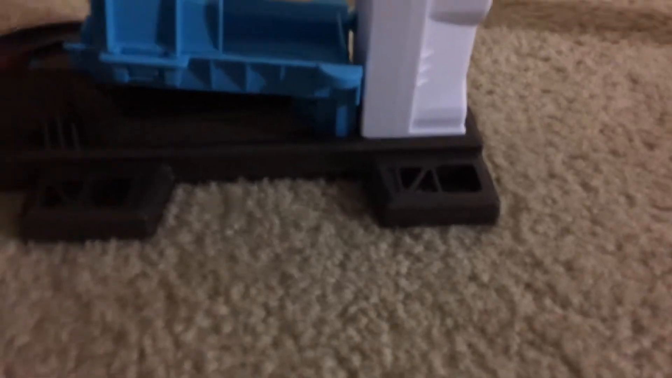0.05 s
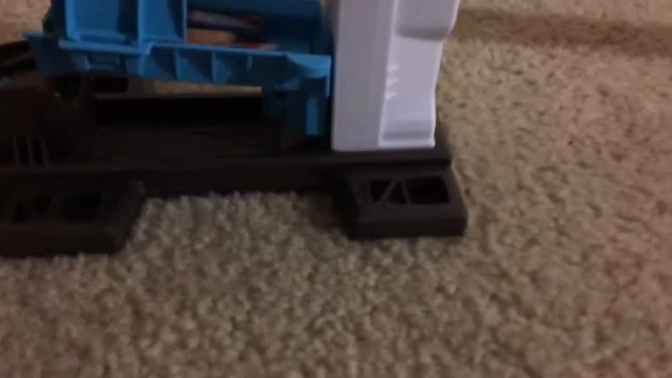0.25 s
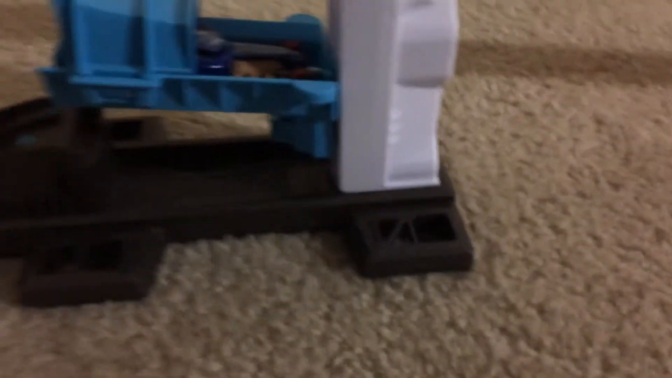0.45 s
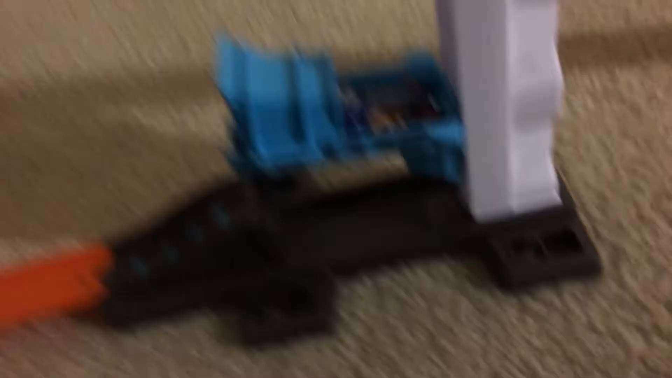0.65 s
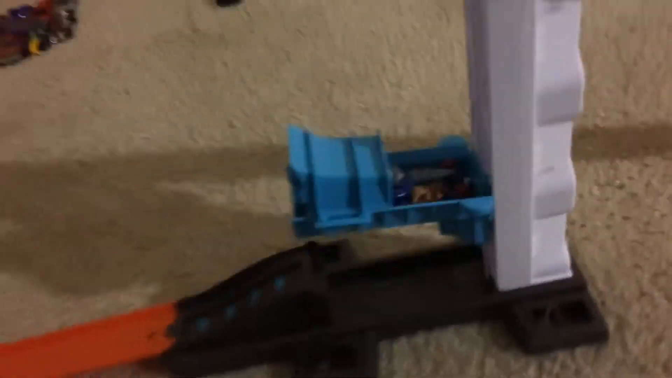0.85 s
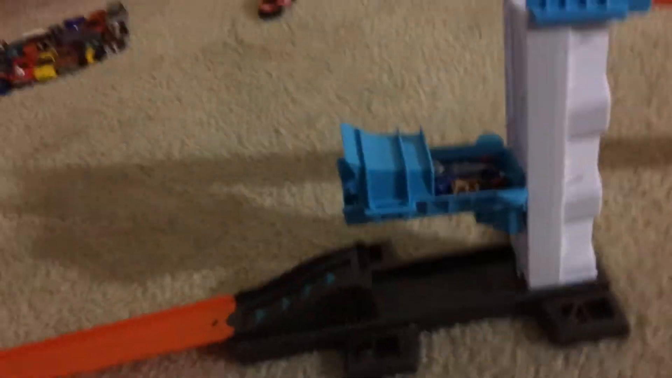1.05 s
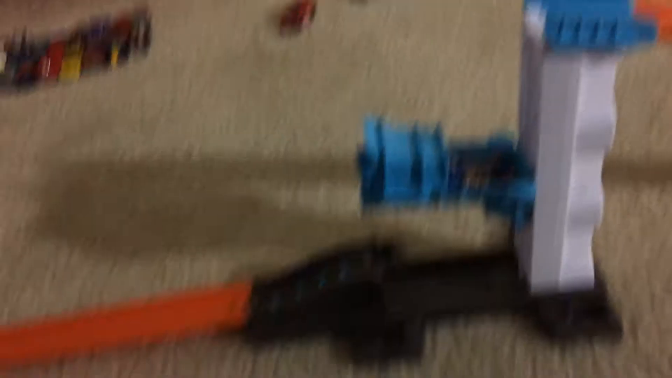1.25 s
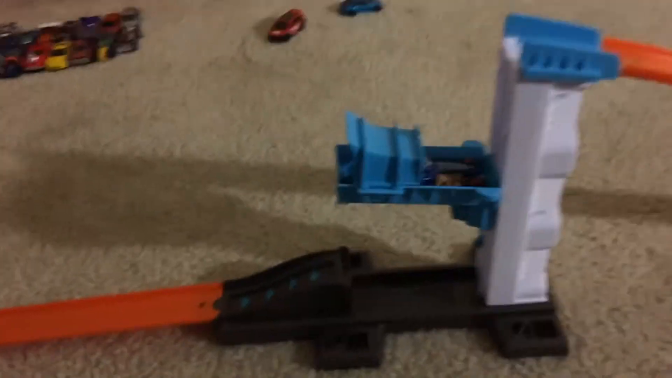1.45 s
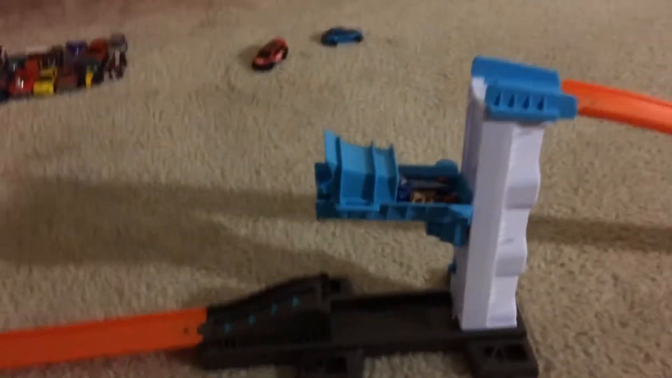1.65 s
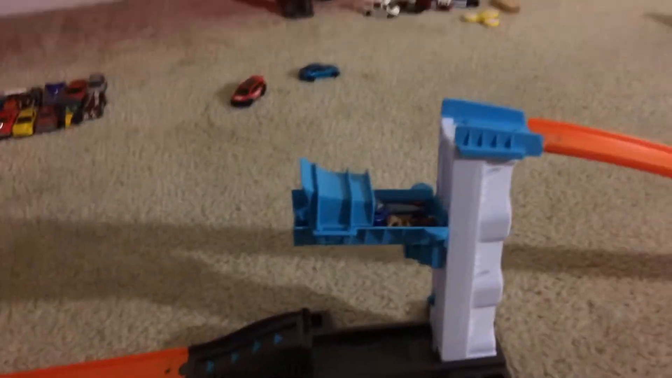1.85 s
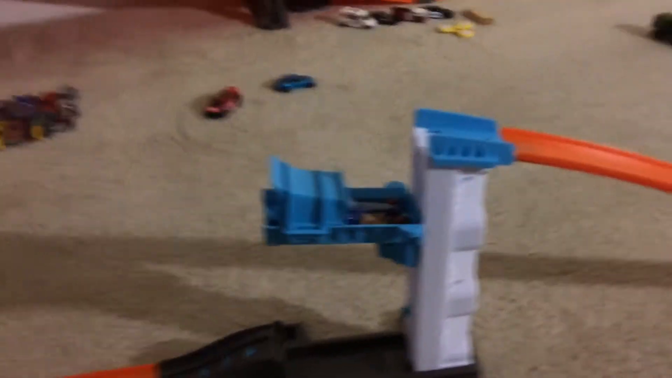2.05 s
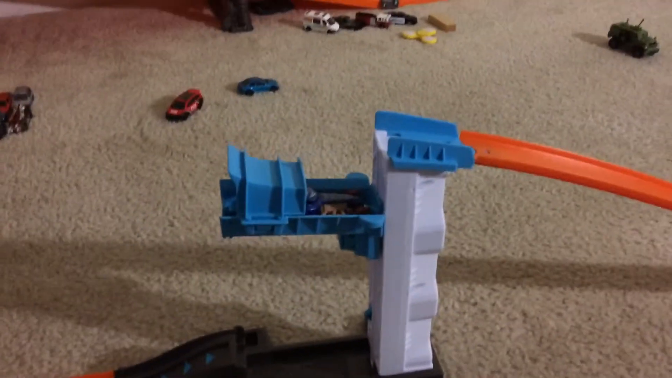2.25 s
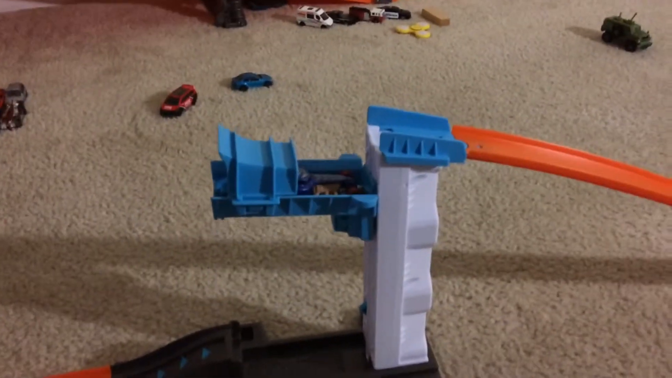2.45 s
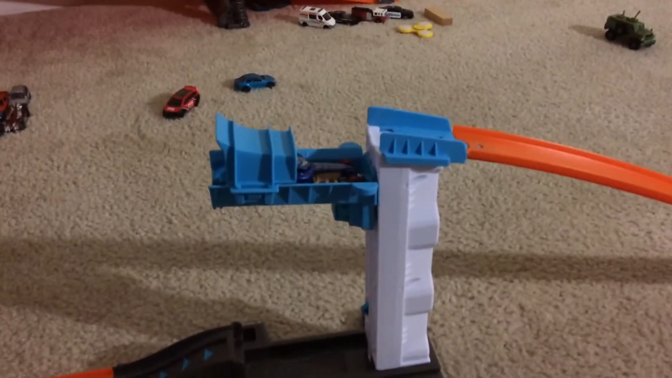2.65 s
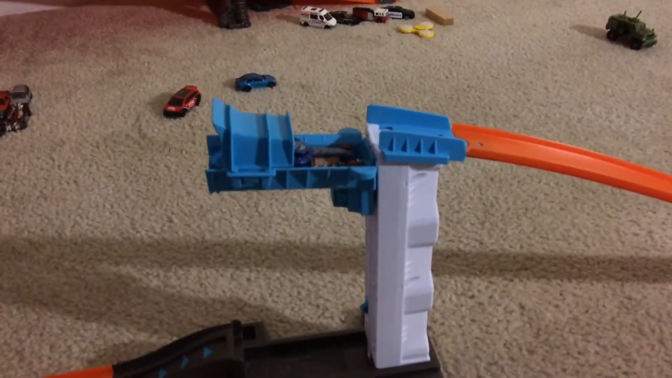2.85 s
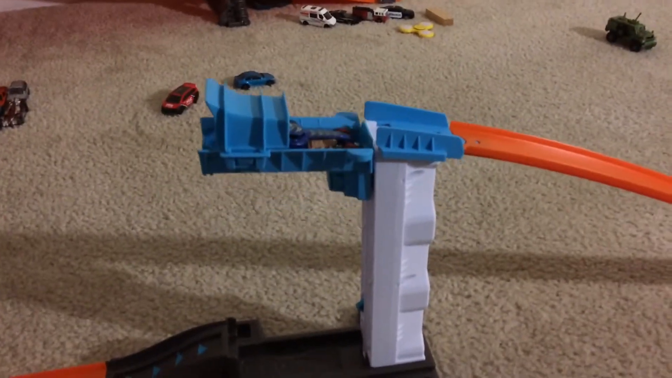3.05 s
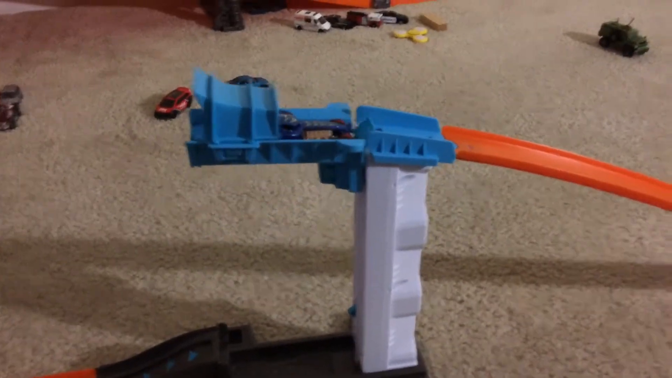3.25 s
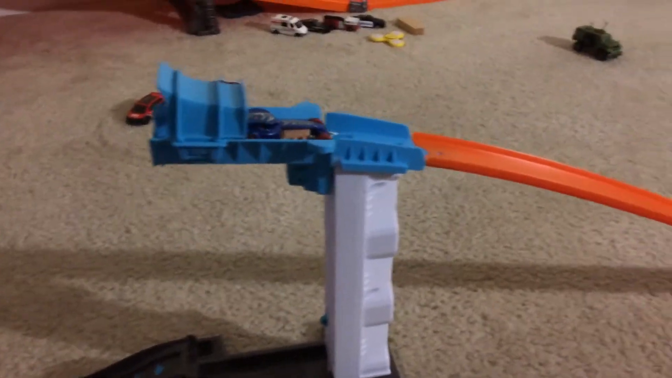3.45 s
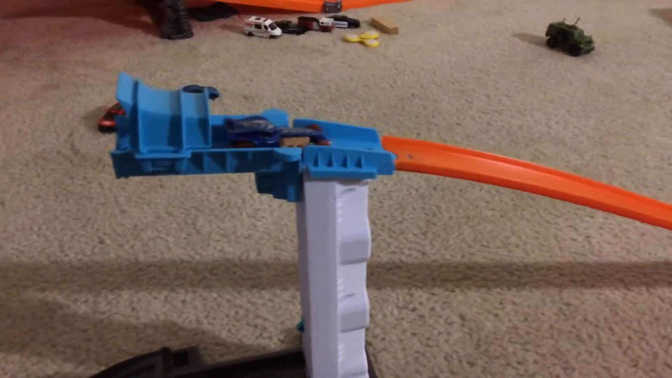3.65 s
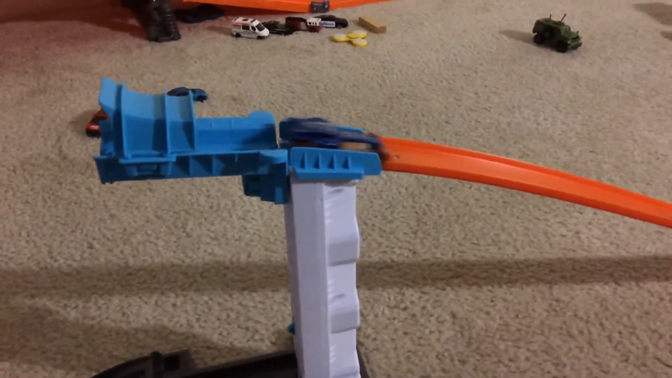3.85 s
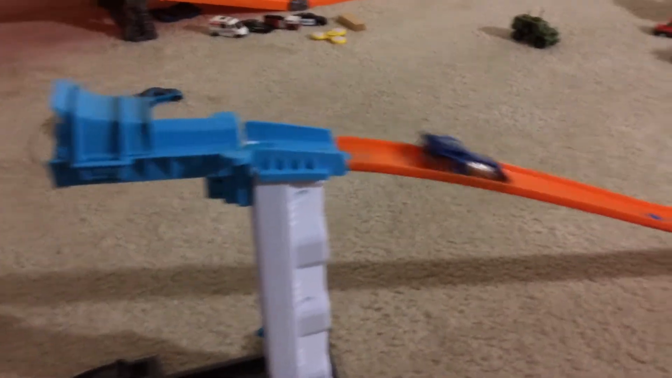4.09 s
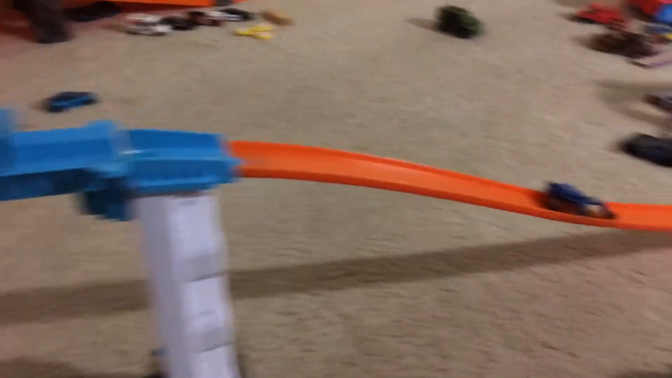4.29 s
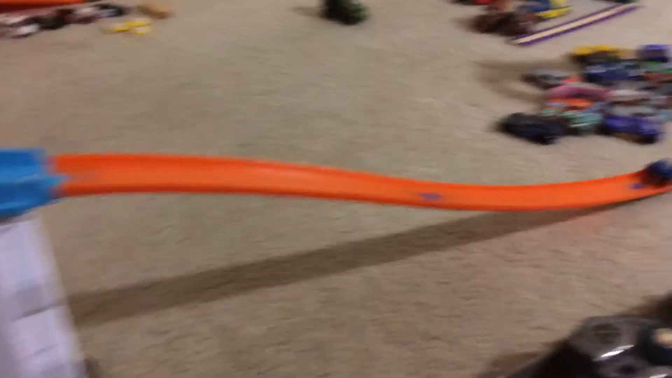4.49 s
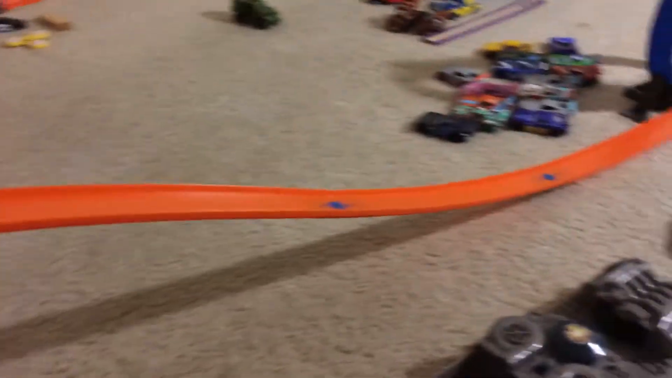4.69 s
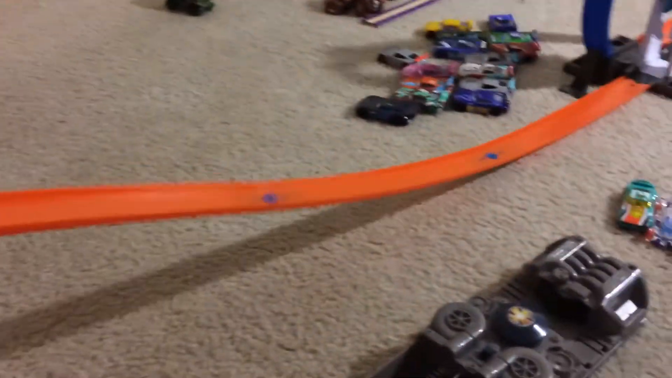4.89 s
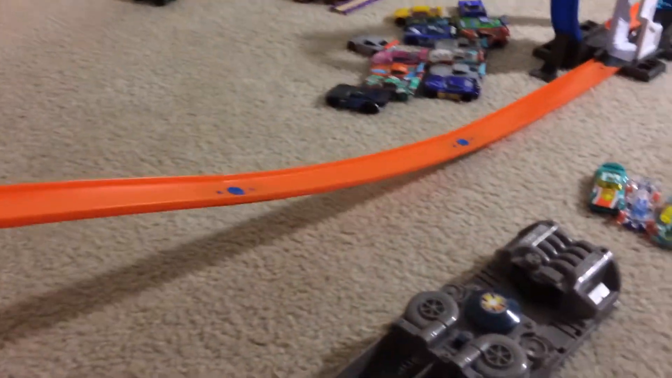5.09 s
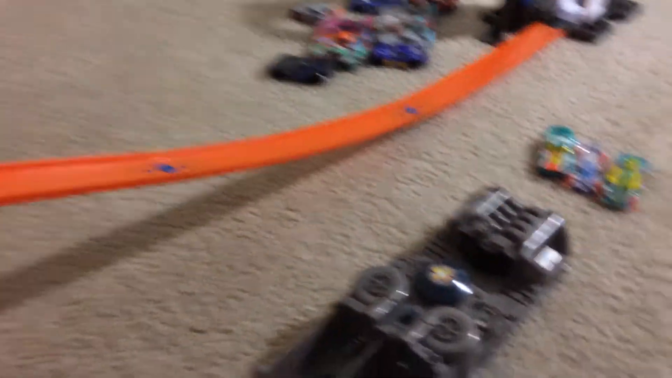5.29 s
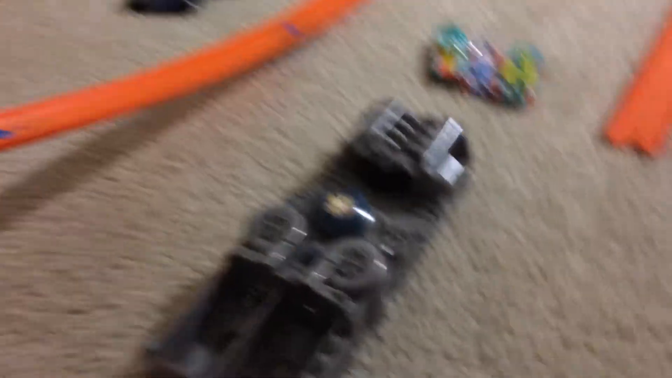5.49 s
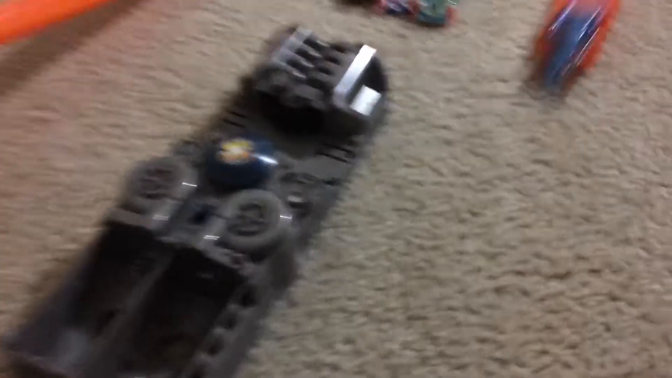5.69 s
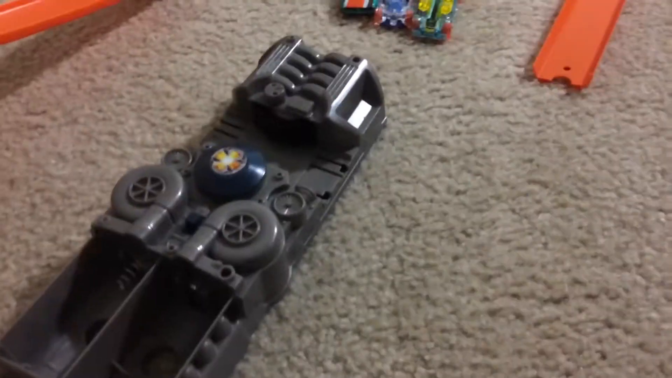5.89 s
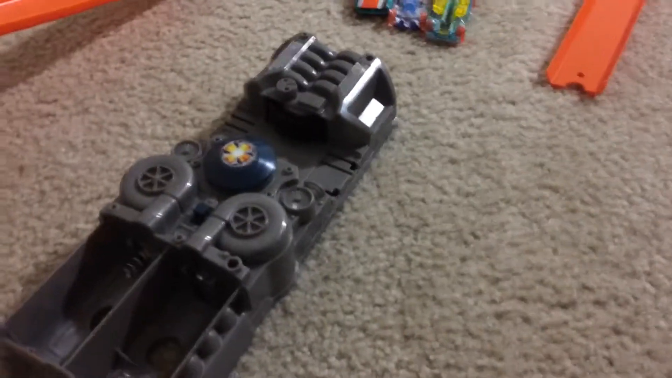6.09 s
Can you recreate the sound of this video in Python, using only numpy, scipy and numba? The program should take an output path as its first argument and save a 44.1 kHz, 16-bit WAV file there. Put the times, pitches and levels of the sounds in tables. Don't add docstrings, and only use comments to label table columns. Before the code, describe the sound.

Close up in a furnished room, a catch creaks faintly and a plastic toy lift breaks loose with a loud, dense clatter. A bright, gear-like hiss whirs for over three seconds, its tone shifting as the handheld microphone moves, then stops abruptly. A small die-cast car clicks onto the track, rolls off with growing chatter, slams hard into a loop, and rattles away to a faint wheel spin.

```python
import sys
import numpy as np
from scipy import signal
from scipy.fft import rfft, irfft
from scipy.io import wavfile
from scipy.ndimage import uniform_filter1d
from numba import njit

SR = 44100
rng = np.random.default_rng(int(sys.argv[2]) if len(sys.argv) > 2 else 0)


def gain_from_db(level_db):
    decades = np.asarray(level_db, float) / 20
    return 10 ** decades


def pcm_store(signal):
    levels = np.round(np.clip(np.atleast_2d(signal), -1, 1) * 32767)
    wavfile.write(sys.argv[1], SR, levels.astype(np.int16).T)


N = 270244


def rms_one(x):
    return x / np.sqrt(np.mean(x ** 2) + 1e-20)


def in_time(rows):
    s, *columns = np.transpose(rows)
    return [np.interp(np.arange(N) / SR, s, c) for c in columns]


def at_hz(points, hz):
    points = np.array(points)
    return np.interp(np.log(hz), np.log(points[:, 0]), points[:, 1])


def drift(rate):
    r = np.exp(-80 * np.pi * rate / SR)
    white = rng.standard_normal(N // 40 + 2002)
    slow = signal.lfilter([1], [1, -2 * r, r * r], white)[2000:]
    return np.interp(np.arange(N) / 40, np.arange(len(slow)), rms_one(slow))


def cut(x, hz, kind, order=2):
    return signal.sosfilt(signal.butter(order, hz, kind, fs=SR, output="sos"), x)


def coloured(x, spectrum):
    hz = np.maximum(np.arange(N // 2 + 1) * SR / N, 1)
    return rms_one(irfft(rfft(x) * gain_from_db(at_hz(spectrum, hz)), N))


@njit
def resonance(x, hz, width_hz, rate):
    out, r = np.zeros(len(x)), np.exp(-np.pi * width_hz / rate)
    for i in range(2, len(x)):
        drive = (1 - r * r) / 2 * (x[i] - x[i - 2])
        out[i] = drive + 2 * r * np.cos(2 * np.pi * hz[i] / rate) * out[i - 1] - r * r * out[i - 2]
    return out


def swells(x, rows, width_hz, width_share, top=2):
    t = np.arange(N) / SR
    for s, half_s, hz, slide, db in rows:
        near = abs(t - s) < 3 * half_s
        since = t[near] - s
        bell = gain_from_db(db) * np.exp(-(since / half_s) ** 2)
        gain = top * bell if top > 0 else top * np.minimum(bell, 1)
        x = x.copy()
        x[near] += gain * resonance(x[near], hz + slide * since, width_hz + width_share * hz, SR)
    return x


def friction(per_s, spread_db, grain_db, flutter_db):
    sizes = gain_from_db(spread_db * np.minimum(rng.exponential(1, N), 4)) * rng.choice([-1, 1], N)
    grains = rms_one(sizes * (rng.random(N) < per_s / SR))
    flutter = gain_from_db(flutter_db * (drift(36.0) + drift(90.0)))
    return (rng.standard_normal(N) + gain_from_db(grain_db) * grains) * flutter


def patchy(x, patchy_db, width, length):
    cells = signal.stft(x, nperseg=1024)[2]
    field = rng.standard_normal(cells.shape)
    for size, axis in ((width, 0), (length, 1)) * 2:
        field = uniform_filter1d(field, size, axis=axis)
    return signal.istft(cells * gain_from_db(patchy_db * rms_one(field)), nperseg=1024)[1][:N]


def tilted(x, middle_db, low_db, top_db, edges_hz):
    hz, spectrum = np.arange(N // 2 + 1) * SR / N, rfft(x)
    low = irfft(spectrum / (1 + (hz / edges_hz[0]) ** 6), N)
    top = irfft(spectrum / (1 + (edges_hz[1] / (hz + 1)) ** 6), N)
    middle = x - low - top
    return gain_from_db(middle_db) * rms_one(middle) + gain_from_db(low_db) * rms_one(low) + gain_from_db(top_db) * rms_one(top)


def knocks(events, thud_db, ring_db, width_hz, thud_hz, low_hz=900.):
    out, t = np.zeros(N + 4096), np.arange(4096) / SR
    whites = rng.standard_normal((len(events), 4096))
    for (s, peak_db, hz, snap_db, t60), white in zip(events, whites):
        burst = white * gain_from_db(-60 * t / max(t60, .002)) * np.minimum(t / .0002, 1)
        crack = cut(burst, [low_hz, 7000.], "band")
        crack = crack + gain_from_db(ring_db) * resonance(crack, np.full(len(t), float(hz)), width_hz, SR)
        snap = cut(burst, [7000, 12500], "band")
        thud = cut(white * gain_from_db(-60 * t / 0.038), [70., thud_hz], "band")
        parts = (crack, 0), (snap, snap_db), (thud, thud_db + 0.28 * snap_db)
        for part, rel_db in parts:
            out[round(s * SR):][:len(t)] += gain_from_db(peak_db + rel_db) * part / abs(part).max()
    return out[:N]


def still_air():
    # f/Hz, level/dB per Hz
    air_spectrum = [(15, -23), (25, 10.5), (131, 9.5), (190, 7), (270, -3), (475, -2), (709, -4), (927, -3),
                    (1180, -16), (1720, 0), (1960, -13), (2930, -1), (4870, -10), (10000, -20),
                    (15000, -25)]
    return gain_from_db(-58.5) * coloured(rng.standard_normal(N), air_spectrum)


def grip():
    # t/s, level/dB, f/Hz
    creak = [
        (0, -52.5, 150),
        (.04, -46, 257),
        (.075, -52, 330),
        (.09, -72.5, 330),
    ]
    level_db, hz = in_time(creak)
    return gain_from_db(level_db) * rms_one(resonance(rng.standard_normal(N), hz, 120., SR))


def lift():
    # f/Hz, level/dB per Hz
    gears = [(450, -12), (760, -6), (1060, -7), (1520, -7.5), (1870, -10), (3830, -3.5), (4350, -5),
             (6000, -2.5), (6740, -2.5), (10300, 0), (14500, -3.5), (15700, -10), (16300, -24)]
    # t/s, half length/s, f/Hz,
    # slide/(Hz/s), level/dB
    tower_modes = [(0.06, 0.051, 3560, 31, 7.5), (0.164, 0.02, 960, 37, 7), (.85, .2, 1120, -100, -4.5),
                   (2.598, 0.24, 1490, 30, -10), (.3, 0.18, 2800, -30, -4), (0.334, 0.13, 1680, -29, 4.5),
                   (0.627, 0.46, 2390, -200, -4.5), (0.58, 0.21, 4150, -150, -4),
                   (0.916, .17, 3810, -1200, 0.5), (1.1, 0.14, 2620, 198, -1),
                   (1.502, 0.17, 4030, -100, -11), (1.216, 0.21, 774, 33, -2.5), (1.64, 0.11, 836, 31, 2),
                   (2.072, 0.25, 3500, -300, 0.5), (2.297, 0.36, 3930, 53, -14),
                   (2.018, 0.15, 2620, 400, -1.5), (2.092, 0.31, 935, 100, -2), (2.6, 0.4, 3310, 51, -11.5),
                   (2.625, 0.24, 1390, 304, -6), (2.892, 0.31, 2920, 52, -2),
                   (3.041, 0.19, 3880, -100, -0.5), (3.19, 0.16, 2056, -100, -1.5),
                   (3.2, 0.26, 1500, 34, -5),
                   (.34, 0.22, 7330, -300, -4), (.34, 0.2, 9070, 296, -0.5), (.56, 0.12, 6370, 101, -6),
                  (.9, 0.31, 10350, 1501.5, -9.5), (1.3, 0.23, 5800, 96, -15), (1.35, 0.2, 9800, 3008, -5),
                  (1.45, 0.083, 7930, 53, 2), (2.22, 0.33, 6260, -500, -0.5), (2.67, 0.35, 7440, -500, -15),
                  (3.45, .1, 9650, 51, -6)]
    # t/s, half length/s, f/Hz, slide/(Hz/s), depth/dB below full
    shadows = [(.95, 0.084, 4200, 50, -6), (1.25, .1, 2910, 50, -6), (0.547, 0.1, 6800, 1508, -7),
               (1.222, 0.21, 3460, 101, -5), (2.0, 0.2, 5120, 55, -9), (2.303, 0.35, 6660, 50, -0.5),
               (2.973, 0.16, 4400, -100, 3), (3.247, 0.27, 780, 50, 0)]
    # f/Hz, width/Hz, depth 0-1
    hollows = [(1830, 35, 0.5), (5240, 50, 0.1), (6420, 120, 0.5), (8280, 64, 0.9)]
    # t/s, level/dB, how far the gears face the microphone/dB
    press = [
        (0.0, -45.5, -61),
        (0.016, -39, -35.5),
        (0.068, -31, -36.5),
        (0.087, -49.5, -25.5),
    ]
    climb = [(0.1, -34, -21), (0.15, -29, -5), (0.159, -19.5, -3.5), (0.244, -26, -0.5), (0.4, -28, -1.5),
             (0.49, -22.5, -3.5), (0.69, -22, -3), (1.25, -26.5, -2.5), (2.6, -27, -1), (3.42, -24.5, -7.5)]
    stop_s, stopped_db = 3.572, -51.5

    hiss = patchy(coloured(friction(2500., 3.8, -9.0, 0.28), gears), 1.9, width=6, length=17)
    hiss = swells(hiss, tower_modes, 70, .04)
    hiss = swells(hiss, shadows, 440, 0, top=-1.06)
    for hz, width_hz, depth in hollows:
        hiss = hiss - min(depth, 1) * resonance(hiss, np.full(N, float(hz)), float(width_hz), SR)
    hiss = cut(hiss, 745.0, "high", order=20) + gain_from_db(-25) * hiss

    t = np.arange(N) / SR
    level_db, facing_db = in_time(press + climb + [(stop_s, stopped_db, climb[-1][2])])
    body_db = level_db - 14 - 0.35 * facing_db - 1.5 * (t - 1)
    gear_top_db = level_db + 4.5 + facing_db
    running = np.clip((stop_s - t) / 0.13, 0, 1)
    return running * tilted(hiss, level_db, body_db, gear_top_db, (1500., 7000.))


def catch_release():
    # t/s, peak level/dB, ring f/Hz, snap above 7 kHz/dB relative, t60/s
    release = [(0.0555, -17, 3260, -23, 0.027), (0.069, -14.5, 3050, -10.5, 0.024),
               (0.0905, -1, 5530, -7, 0.0064), (0.0965, -7, 5570, -13, 0.018),
               (0.0995, -5, 1940, -7, 0.013), (0.1055, 1, 3720, -14, .022), (0.113, -10, 3920, -9.5, 0.015),
               (0.1205, -15.5, 2500, -8.5, 0.02), (0.1225, 0.5, 6150, -1, 0.032),
               (0.125, 0.5, 5340, -4, 0.021), (0.1365, -3, 3360, -3, 0.023), (0.139, -7, 1930, -6, 0.028),
               (0.1455, -3.5, 4540, 8, 0.008), (0.1535, 2.5, 1300, -1, 0.018), (0.158, -10, 3320, -6, .03),
               (0.163, -3, 1560, -10.5, 0.02), (0.167, -1, 960, -17, 0.051), (.174, -12, 4500, -3, 0.025),
               (0.183, -4.5, 4700, -4, 0.0049)]
    settle = [(0.2095, -6.5, 4300, -8.5, 0.012), (0.218, -6.5, 2820, -2, 0.02),
              (0.228, -6, 3420, -6.5, 0.007), (0.279, -5, 2900, -14, 0.017), (0.291, -9, 2900, 1, 0.012),
              (0.3635, -4.5, 1090, -7, 0.027), (0.365, -4, 4560, 3, 0.013), (0.367, -0.5, 1190, -11, 0.016),
              (.385, -19, 1110, -10, 0.013)]
    return knocks(release, -23, 6, 500.0, 450.0) + knocks(settle, -32.5, 13.0, 250.0, 670.0)


def floor_bumps():
    # t/s, peak level/dB, ring f/Hz, snap/dB relative, t60/s
    bumps = [
        (.1, -57, 900, -18, .02),
        (.123, -52, 900, -19, .02),
        (3.42, -59, 900, -18, .02),
        (4.7795, -58, 900, -14, .02),
    ]
    return knocks(bumps, 17.7, 0, 390.0, 178.0)


def track_joints():
    # t/s, peak level/dB, ring f/Hz, snap/dB relative, t60/s
    joints = [(3.6465, -28.5, 1540, 3, 0.048), (3.657, -23, 2050, -24, 0.016),
              (3.764, -39, 3700, -11, 0.0075),  (3.825, -32.5, 2900, -22, .0082),
              (3.842, -34, 1720, -19, 0.021), (3.8875, -27, 3500, -13, .012),
              (3.905, -18, 3500, -42, 0.047), (3.945, -32.5, 2860, 6.5, .009),
              (3.9615, -21, 1670, -33, 0.02), (3.985, -24, 3700, -25, 0.015), (4.05, -36, 3300, 4.5, .024),
              (4.0705, -23.5, 1480, -18, 0.035), (4.1035, -23.5, 1360, -14, 0.018),
              (4.115, -26.5, 3840, -16, 0.0092), (4.211, -27.5, 3500, -11, 0.012),
              (4.284, -29, 1590, -6, 0.0084), (4.386, -27, 1460, -2, 0.0081)]
    return knocks(joints, -28, 8.9, 343.0, 770.0)


def car():
    # f/Hz, level/dB per Hz
    wheel_spectrum = [(88, -60), (150, 4.5), (249, -12), (309, -3.5), (466, -0.5), (514, -4), (601, -4.5),
                      (1530, -6.5), (2980, -5), (4160, -5), (6510, -3.5), (12700, -14.5), (16000, -29)]
    # t/s, half length/s, f/Hz, slide/(Hz/s), level/dB
    track_modes = [(5.485, 0.016, 470, 50, -2), (5.46, .04, 3300, 50, -9), (4.5, 0.12, 3300, -100, 0.5),
                   (4.7, 0.087, 3500, 56.5, -6), (4.81, 0.026, 730, -300, 0.5),
                   (4.82, 0.031, 1020, -300, -2), (5.13, 0.068, 850, -300, -9),
                   (5.1, 0.057, 2300, -900, -6.5), (5.31, 0.098, 2580, -300, 7),
                   (5.58, 0.13, 2130, -200, 5), (5.76, 0.075, 3140, 300, -4), (5.22, 0.019, 560, 50, 3)]
    # t/s, level/dB
    descent = [(3.8, -53), (3.89, -58), (3.992, -51), (4.072, -51), (4.168, -43), (4.306, -40.5),
               (4.556, -39.5), (4.74, -39.5), (4.86, -87)]
    # t/s, level/dB, rise/s and fall/s for 20 dB, brightness/dB
    passes = [(4.795, -23.5, 0.043, 0.12, 4.5), (4.98, -37, 0.43, 0.28, -11), (5.087, -27, 0.16, 0.092, -7),
              (5.29, -35, 0.25, 0.34, 4.9), (5.488, -46.5, 0.18, .06, 13), (5.634, -54, 0.071, 0.033, 17.5),
              (5.76, -43.5, 0.34, 0.12, 1), (5.93, -56, 0.13, 0.16, 6)]

    t, (slope_db,) = np.arange(N) / SR, in_time(descent)
    pass_power, bright = np.zeros(N), np.zeros(N)
    for s, db, rise_s, fall_s, bright_db in passes:
        away = np.maximum((s - t) / rise_s, (t - s) / fall_s)
        power = gain_from_db(db - 20 * away ** 1.15) ** 2
        pass_power += power
        bright += power * gain_from_db(bright_db) ** 2
    wheels_db = 10 * np.log10(gain_from_db(slope_db) ** 2 + pass_power)
    slope_top_db = slope_db - 8 + 3.6 * (slope_db + 40.5)
    top_db = 10 * np.log10(gain_from_db(slope_top_db) ** 2 + bright)
    rumble_db = 10 * np.log10(gain_from_db(slope_db - 18.5) ** 2 + gain_from_db(-16.5) ** 2 * bright)

    chatter = friction(2000., 3., -5., 1.)
    wheels = patchy(coloured(chatter, wheel_spectrum), 1.5, width=8, length=5)
    wheels = swells(wheels, track_modes, 0, 0.22)
    rolling = np.clip((t - 3.8) / 0.036, 0, 1)
    return rolling * tilted(wheels, wheels_db, rumble_db, top_db, (900., 4300.))


def loop_crash():
    # t/s, peak level/dB, ring f/Hz, snap/dB relative, t60/s
    crash = [
        (4.7215, -24, 2410, -12, .009),
        (4.7478, -13, 6250, -.5, .02),
        (4.7518, -9, 2600, 1.5, .008),
        (4.757, -17, 1710, -3, .05),
        (4.7715, -13, 820, -4, .009),
        (4.7793, 0, 6220, 1, .014),
        (4.79, -2, 4430, 0, .012),
    ]
    return knocks(crash, -29, 9, 450.0, 630.0, low_hz=600.)


def dry_knocks():
    # t/s, peak level/dB, ring f/Hz, snap/dB relative, t60/s
    more_knocks = [(4.987, -25, 3380, -8, .006), (5.0205, -24, 9500, 4, .008), (5.243, -25, 9000, 0, .006),
                   (5.322, -22, 5200, 0, .006), (5.364, -26, 6800, 6, .006), (5.447, -24, 5200, -4, .005),
                   (5.492, -23, 6500, 0, .006), (5.633, -25, 5000, -8, .008), (5.7147, -25, 4610, -4, .005),
                   (5.7456, -29, 4800, -8, .008), (5.791, -33, 3600, -4, .006), (5.8115, -33, 3630, -4, .006),
                   (5.8628, -38, 3620, 0, 0.0052)]
    return knocks(more_knocks, -26, 5, 600.0, 590.0, low_hz=2200.)


def loop_knocks():
    # t/s, peak level/dB, ring f/Hz, snap/dB relative, t60/s
    loop = [(5.02, -19, 4890, 1, .012), (5.09, -20, 1900, -9, .02), (5.193, -21, 3830, 0, .0098),
            (5.215, -19, 6300, 3, 0.012), (5.259, -12.5, 3160, -12, .009), (5.27, -20, 3360, 5, .009),
            (5.2975, -14, 6340, -6, .006), (5.357, -21, 3250, -10, .009), (5.383, -12.5, 5240, -12, 0.0068),
            (5.432, -26.5, 3360, 7, 0.0077), (5.473, -17, 6300, -2, 0.0068), (5.497, -22, 3680, -4, 0.015),
            (5.602, -24, 6750, 1, 0.005), (5.6283, -18, 4640, -3, 0.0043), (5.6745, -22, 5430, -14, 0.0082),
            (5.8773, -33, 6500, -3, .008), (5.9265, -45, 4400, 0, .009)]
    return knocks(loop, -26, 5, 600.0, 590.0, low_hz=2200.)


def spinning():
    # f/Hz, width/Hz, level/dB
    axles = [(2500, 260, -3.5), (3750, 330, 0), (4250, 260, -2), (7200, 900, -6), (9050, 380, -3)]
    # t/s, level/dB
    spin = [
        (5.7, -85),
        (5.86, -60),
        (6.0, -64.5),
        (6.13, -70),
    ]
    # t/s, peak level/dB
    wobbles = [(5.8782, -29), (5.882, -34), (5.897, -36), (5.926, -38), (5.9312, -35), (5.9412, -31),
               (5.9591, -33), (5.98, -43), (6.005, -40), (6.021, -42), (6.038, -50), (6.055, -40),
               (6.066, -43), (6.0799, -43), (6.091, -46), (6.1103, -43)]

    t = np.arange(N) / SR
    level = gain_from_db(in_time(spin)[0])
    for s, db in wobbles:
        decay_db = -60 * np.maximum(t - s, 0) / 0.017
        level = level + gain_from_db(db - 17.5 + decay_db) * (t > s)
    rattle = level * friction(400., 2., -9., 1.5)
    bands = np.zeros(N)
    for hz, width_hz, db in axles:
        gain = gain_from_db(db) / np.sqrt(width_hz / SR)
        bands += gain * resonance(rattle, np.full(N, float(hz)), float(width_hz), SR)
    return cut(bands, [2100., 9700.], "band", order=5)


def room(x):
    # f/Hz, t60/s
    room_t60 = [(100, 0.22), (500, 0.5), (2000, 0.54), (6000, 0.46), (14000, 0.31)]
    hz, s, cells = signal.stft(rng.standard_normal(SR), SR, nperseg=512)
    decay = gain_from_db(-60 * s / at_hz(room_t60, hz + 1)[:, None])
    tail = signal.istft(cells * decay, SR, nperseg=512)[1]
    tail = tail * np.clip((np.arange(len(tail)) / SR - .004) / 0.0028, 0, 1)
    return signal.fftconvolve(x, tail / np.sqrt(np.sum(tail ** 2)))[:N]


def scene():
    air, creak, hiss = still_air(), grip(), lift()
    near = catch_release()
    far = floor_bumps() + track_joints() + loop_crash() + loop_knocks()
    rolling = car() + spinning()
    wet = room(gain_from_db(-11.5) * hiss + gain_from_db(-13.5) * near + gain_from_db(-15.5) * rolling + gain_from_db(-6.5) * far)
    mono = hiss + rolling + near + far + wet + air + creak + dry_knocks()
    return np.array([mono, mono])


def thinned(x, chance_db, share):
    # f/Hz, level/dB
    thresholds = [(3000, -44), (5000, -18), (9000, -36), (12000, 0), (13500, -8.5), (15700, -5), (16000, 17)]
    hz, s, cells = signal.stft(x, SR, window="cosine", nperseg=2048)
    power = abs(cells) ** 2 + 1e-20
    region, frame = uniform_filter1d(power, size=61, axis=0), power.mean(axis=0)
    valley_db = 10 * np.log10(uniform_filter1d(power, size=5, axis=0) / region)
    weak_db = 10 * np.log10(region / frame)
    luck = uniform_filter1d(rng.standard_normal(cells.shape), size=9, axis=0)
    luck = uniform_filter1d(luck, size=3, axis=1)
    salience_db = valley_db + share * weak_db + chance_db * rms_one(luck)
    kept = salience_db > at_hz(thresholds, hz + 1)[:, None]
    sudden = region[500] > gain_from_db(12) * np.roll(region[500], 1)
    return signal.istft(cells * (kept | sudden), SR, window="cosine", nperseg=2048)[1][:N]


def opposed_noise():
    # t/s, low f/Hz, high f/Hz, level/dB
    bursts = [(0.667, 15500, 15900, -35), (0.67, 4260, 5150, -33), (0.672, 9150, 10420, -27),
              (1.645, 5270, 6460, -37), (1.646, 10980, 12360, -36), (1.857, 5600, 6900, -35),
              (1.922, 5730, 6980, -31), (1.996, 7700, 8900, -34), (2.133, 4600, 5770, -36),
              (2.599, 8870, 10200, -32), (2.6, 5600, 6900, -34), (2.713, 4610, 5660, -35),
              (2.726, 6300, 8900, -29), (2.738, 13010, 14510, -34), (2.832, 9560, 11000, -33)]
    side, window = np.zeros(N), np.sin(np.pi * np.arange(2048) / 2048)
    whites = rng.standard_normal((len(bursts), 2048))
    for (s, low_hz, high_hz, level_db), white in zip(bursts, whites):
        band = rms_one(cut(white, [low_hz, high_hz], "band", order=8))
        side[round(s * SR) - 1024:][:2048] += gain_from_db(level_db - 1.0) * window * band
    return side * [[1], [-1]]


def low_pass(x):
    return signal.sosfilt(signal.butter(12, 16480, fs=SR, output="sos"), x)


def record(dry):
    limited = np.tanh(cut(dry[0], 45., "high", order=4) / 1.12) * 0.98
    mix = thinned(limited, 7.5, 0.2) + opposed_noise()
    mix = cut(mix, 16300, "low", order=16)
    return low_pass(mix)


dry = scene()
out = record(dry)
pcm_store(out)
```